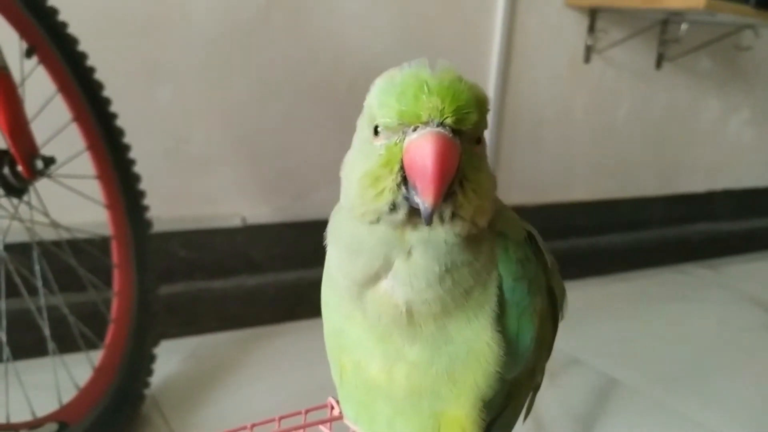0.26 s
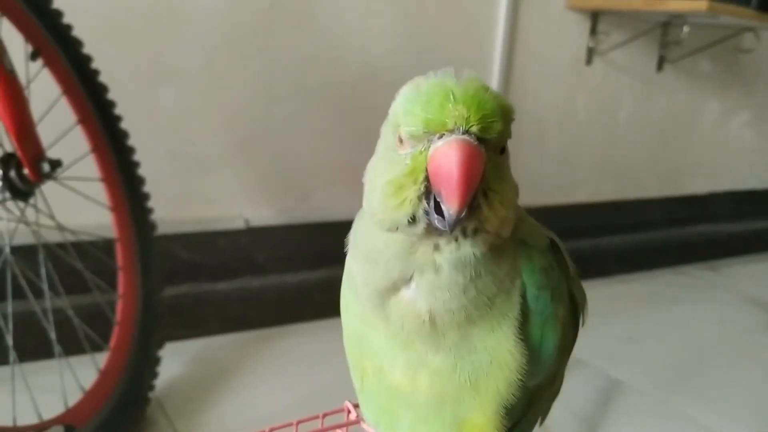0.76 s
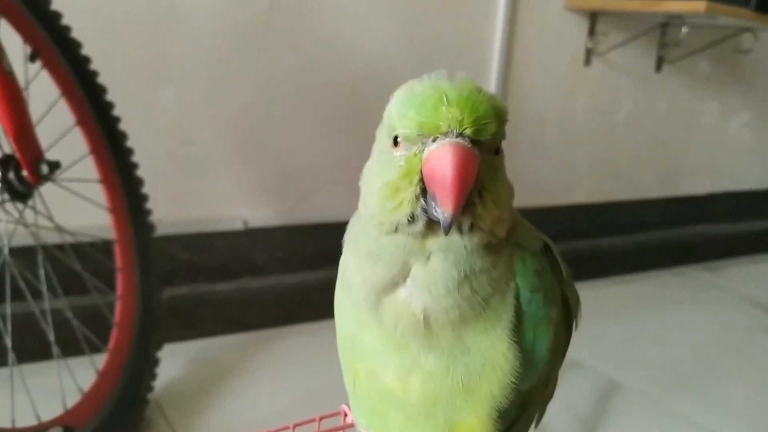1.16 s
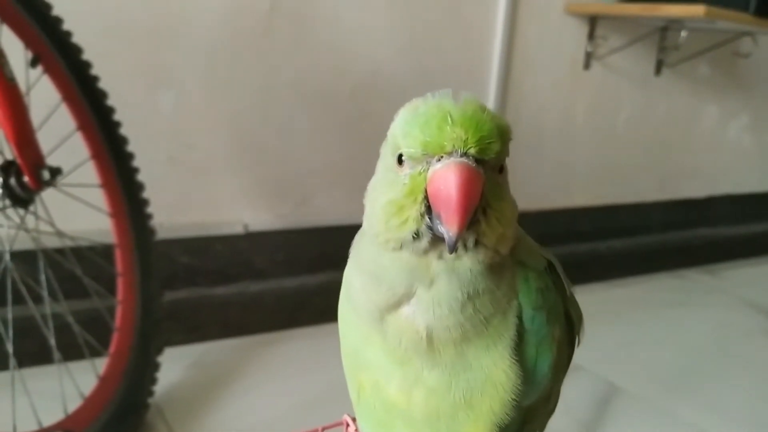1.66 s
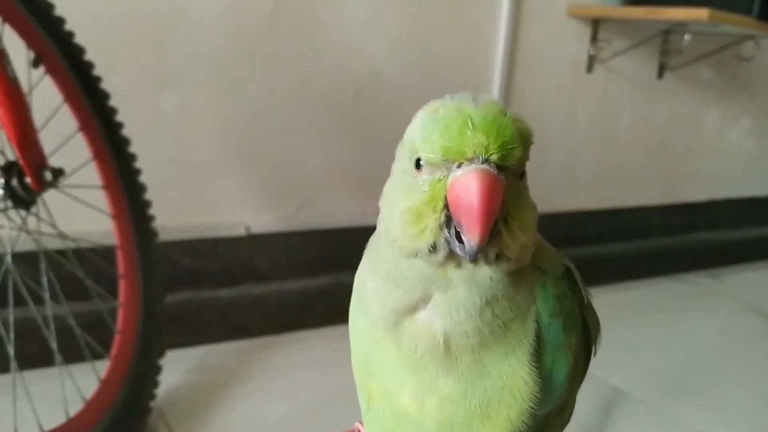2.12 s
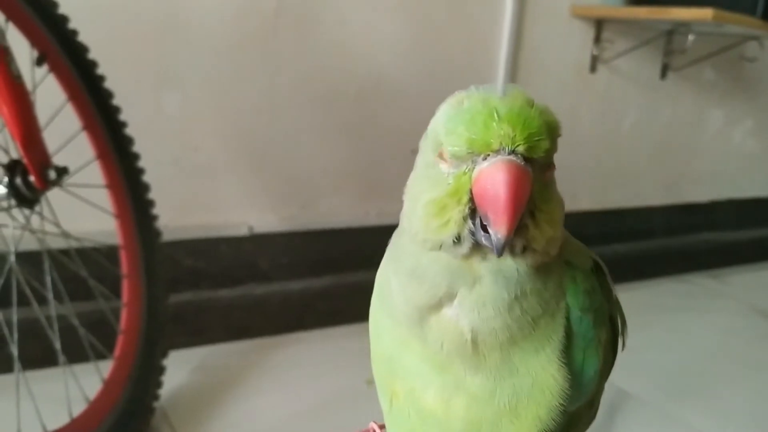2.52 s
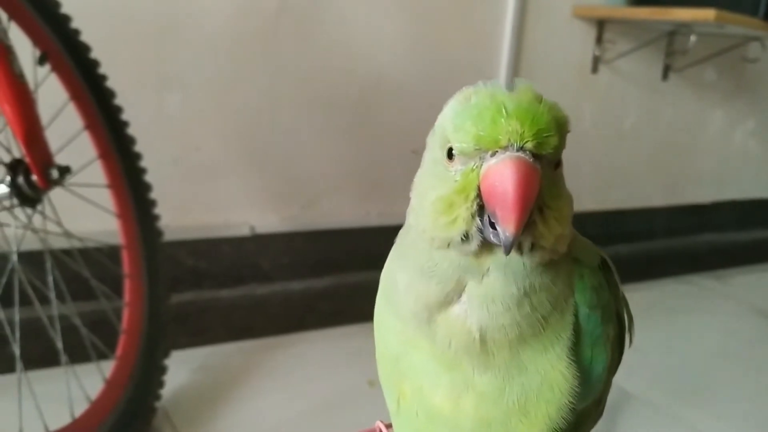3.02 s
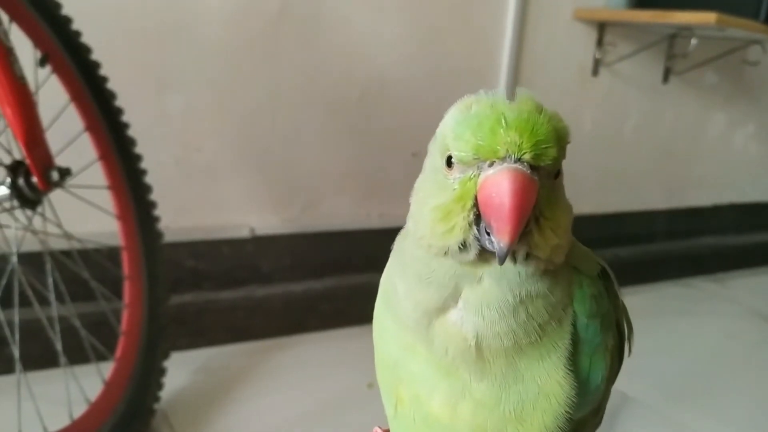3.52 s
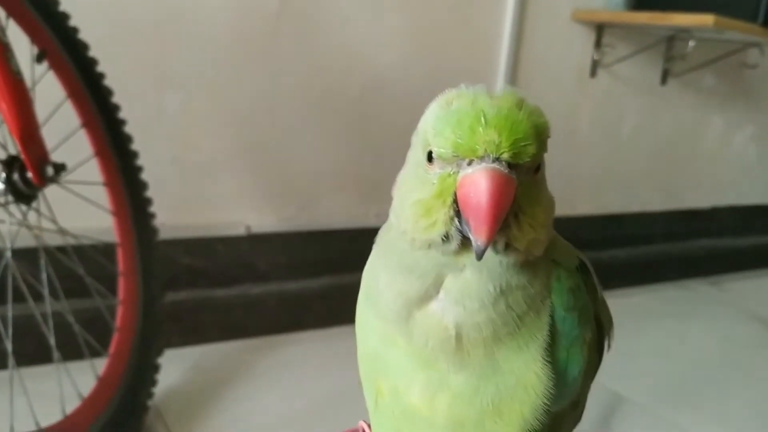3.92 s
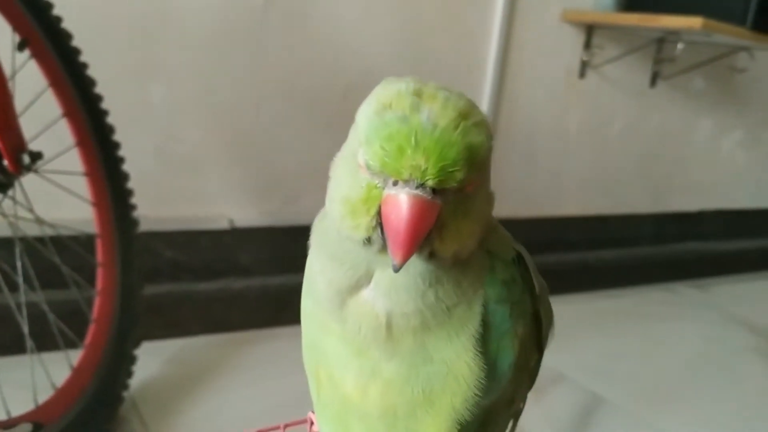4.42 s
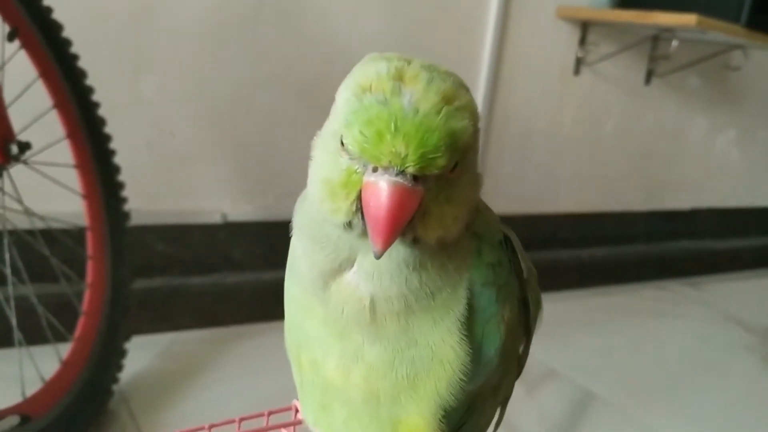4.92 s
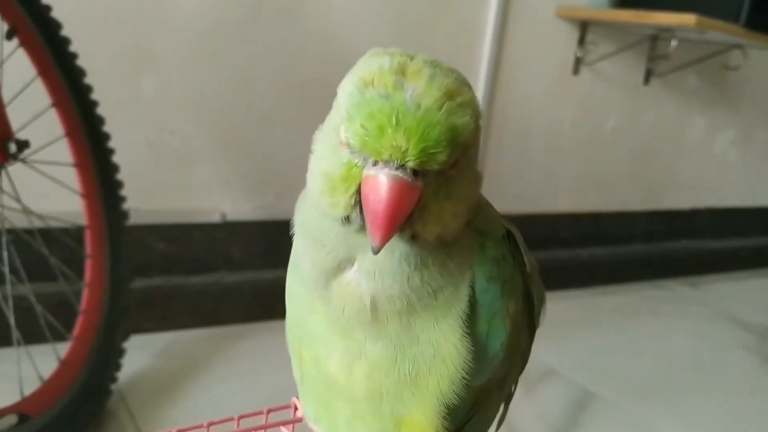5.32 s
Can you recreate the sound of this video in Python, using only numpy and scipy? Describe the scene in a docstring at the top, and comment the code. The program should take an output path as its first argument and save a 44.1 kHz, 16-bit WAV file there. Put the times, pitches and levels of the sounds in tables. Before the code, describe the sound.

A close parakeet whistles a broken run of short gliding calls, some sweet, some raspy, in a quiet hard-walled room with faint hum.

```python
"""A bare tiled room, with a parakeet close to a two-port microphone whistling a run of gliding calls.
Each note is a stack of partials on one gliding pitch that may jump register, roughened by rasp and breath.
The hard walls answer with early echoes and a tail of random taps that dies band by band.
Beneath lie shaped noise for the room air, the ring of an earlier call, a motor hum and thin whine
made of drifting tones, and one soft low bump."""
import sys
import numpy as np
from scipy import signal
from scipy.fft import rfft, irfft
from scipy.io import wavfile
from scipy.ndimage import uniform_filter1d, minimum_filter1d

SR = 44100
rng = np.random.default_rng(int(sys.argv[2]) if len(sys.argv) > 2 else 0)


def transcribe(u):
    """Save the signal u as a 16-bit wav file named by the first command-line argument.

    u: samples, shape (n,) or (channels, n), limited to [-1, 1]; the rate is SR.
    q: integer samples, one column per channel.
    """
    v = np.clip(np.atleast_2d(u).T, -1, 1)
    q = np.round(v * 32767).astype(np.int16)
    wavfile.write(sys.argv[1], SR, q)


N = 245637
EDGE_HZ = 15950  # top of the microphone's band


def gain_of(db):
    """dB to amplitude."""
    return 10 ** (np.asarray(db) / 20)


def evened(x):
    """Scales to rms 1."""
    return x / np.sqrt(np.mean(x ** 2) + 1e-20)


def read(points, hz, column=1):
    """Reads one column of a table on a log-frequency axis."""
    table = np.transpose(points)
    return np.interp(np.log(hz + 1), np.log(table[0] + 1), table[column])


def add(mix, s, sound):
    """Mixes a sound in at time s."""
    part = mix[:, round(s * SR):][:, :sound.shape[-1]]
    part += sound[..., :part.shape[1]]


def shake(shape, size):
    """Smooth random motion of rms 1: noise averaged twice over size samples."""
    once = uniform_filter1d(rng.standard_normal(shape), size)
    return evened(uniform_filter1d(once, size))


def wavering(hz, width, steady=0):
    """A tone whose height and phase drift at random: noise in a narrow resonance, plus a steady share."""
    r = np.exp(-np.pi * width / SR)
    noise = rng.standard_normal(N + SR) + 1j * rng.standard_normal(N + SR)
    drift = signal.lfilter([1], [1, -r], noise)[SR:]  # the first second lets the resonance settle
    drift = steady + drift / np.std(drift)
    return evened((drift * np.exp(2j * np.pi * hz * np.arange(N) / SR)).real)


# colour of the room air: (frequency [Hz], relative level [dB])
AIR_COLOUR = [(12, -21.5), (20, 4.5), (55, -10.5), (149, -9.5), (268, -10.5), (300, -14), (335, -10.5),
              (482, -14), (819, -17.5), (3700, -30.5), (4370, -28.5), (5620, -33), (8790, -29.5),
              (12000, -30), (15800, -35)]
# how alike the air is in the two ports: (frequency [Hz], left-right likeness [-1 to 1])
PORT_LIKENESS = [(60, 0.7), (180, 1), (550, 0.32), (1650, 0.27), (4970, 0.063), (15000, -0.23)]
AIR_DB, AIR_PATCH_DB = -57, 0.42  # rms level; unevenness in time and frequency


def air():
    """Room air and microphone hiss: alike in both ports in the bass, unrelated in the treble."""
    frames, hz = N // 512 + 5, np.fft.rfftfreq(2048, 1 / SR)
    a, b, c, d, patches = rng.standard_normal((5, 1025, frames))
    patches = uniform_filter1d(patches, 12, axis=0)
    patches = evened(uniform_filter1d(patches, 14, axis=1))
    same = np.clip(read(PORT_LIKENESS, hz), -1, 1)[:, None]
    left = a + 1j * b
    right = same * left + np.sqrt(1 - same ** 2) * (c + 1j * d)
    z = np.array([left, right]) * gain_of(read(AIR_COLOUR, hz)[:, None] + AIR_PATCH_DB * patches)
    noise = signal.istft(z, nperseg=2048, noverlap=1536)[1][:, :N]
    return gain_of(AIR_DB) * evened(noise)


# an earlier call still rings: (frequency [Hz], width [Hz], level at 0 s [dB])
EARLIER_CALL = [(1818, 30, -52), (7250, 150, -72)]


def linger():
    """The ring of the earlier call, different at each port, dying as fast as the walls let its pitch die."""
    t = np.arange(N) / SR
    ring = np.zeros((2, N))
    for hz, width, db in EARLIER_CALL:
        fade = gain_of(db - 60 * t / read(WALL_DECAY, hz))
        ring += fade * [wavering(hz, width), wavering(hz, width)]
    return ring


# motor hum and thin whine, tones that drift a little: (frequency [Hz], width [Hz], level [dB])
HUM_TONES = [(153, 8.2, -71), (305.4, 4, -68.5), (496, 6, -74.5), (547, 6.4, -76), (4000, 12, -91),
             (4320, 12, -76)]


def hum():
    """Motor hum and whine: each tone is a steady share plus a drifting share, alike in both ports."""
    return sum(gain_of(db) * wavering(hz, width, steady=1.0) for hz, width, db in HUM_TONES)


# moments when the voice turns hoarse: (time [s], width [s], added rasp [0-1])
HOARSE_MOMENTS = [(1.26, .03, 0.39), (1.965, 0.013, 0.24), (2.535, 0.01, 0.15), (3.083, 0.011, 0.35),
                  (4.971, 0.0097, 0.12), (5.453, 0.031, .3)]
RASP_PER_GLIDE = .004  # growth of rasp per octave a second of glide


def roughness(t, hz, rasp):
    """Hoarse moments alone, and the whole rasp, which a fast glide also raises."""
    hoarse = sum(more * np.exp(-((t - at) / width) ** 2) for at, width, more in HOARSE_MOMENTS)
    glide = abs(np.gradient(np.log2(hz))) * SR  # octaves a second
    return hoarse, np.clip(rasp + hoarse + RASP_PER_GLIDE * glide, 0, 1)


# colour of the overtones: (frequency [Hz], relative level [dB])
THROAT_COLOUR = [(1500, -7.5), (2800, 3), (3600, 1.5), (4300, 2), (5300, -5.5), (6500, -1.5), (8500, -5),
                 (10500, -12), (16000, -30.5)]
# colour that the beak gives the treble partials: (frequency [Hz], relative level [dB])
BEAK_COLOUR = [(4000, -27), (5200, -21.5), (6300, -1.5), (7500, -14.5), (8700, -9), (10000, -0.5),
               (12800, -0.5), (13700, -19.5), (16000, -29)]
TILT_HZ = 10000  # the treble tilts about this pitch
FLUTTER_DB, SKIRT = .7, 2.1  # flutter of the strongest partial; how far rasp roughens the weak partials


def partial_sizes(k, hz, levels_db, rasp, fall_db, tilt_db, odd_db, shift):
    """Throat and beak colour the partials; faint ones flutter most and grow a rough skirt with rasp."""
    first_db, over_db, upper_db = levels_db
    throat_db = read(THROAT_COLOUR, k * hz) - read(THROAT_COLOUR, 2 * hz)
    over = gain_of(over_db + fall_db * np.log2(k / 2) + throat_db)
    tilt = tilt_db * np.log2(k * hz / TILT_HZ)
    treble = gain_of(upper_db + read(BEAK_COLOUR, k * hz / shift) + tilt + odd_db * (k % 2)) * (k > 2)
    size = np.where(k == 1, gain_of(first_db), np.hypot(over, treble)) * (k * hz < EDGE_HZ)
    weak = (1 - size / size.max(0)) ** 4  # 0 for the strongest partial, near 1 for faint ones
    size *= gain_of(FLUTTER_DB * (1 + 3.5 * weak) * shake(size.shape, size=200))
    return size * (1 + SKIRT * rasp * weak * np.log(k) * shake(size.shape, size=35))


# added delay of the left port over time, as a near reflection changes with each call:
# (time [s], delay [microseconds])
LEFT_DELAY = [(.3, 39.5), (1.3, 23), (2, 10.5), (2.6, 0), (3.2, -4.5), (4.9, 68.5), (5.4, 67.5)]
# a near reflection, delay and level of the left port by pitch:
# (frequency [Hz], delay of the left [microseconds], left-right level [dB])
PORT_REFLECTION = [(990, 18, -2.5), (1380, 70.5, -0.5), (1690, -9, -3), (1780, 31, 5.5), (1920, 108.5, 4.5),
                   (2320, 89.5, 2), (2620, 79.5, -4.5), (3070, 37.5, -2.5), (3614, 46.5, -4.5),
                   (4160, 58, -0.5), (16800, 48, -1)]


def at_ports(t, k, hz, size, turns):
    """A near reflection delays and shades the left port by pitch."""
    lag = (np.interp(t, *np.transpose(LEFT_DELAY)) + read(PORT_REFLECTION, k * hz)) * 1e-6
    lag = uniform_filter1d(lag, size=300)
    shade = gain_of(uniform_filter1d(read(PORT_REFLECTION, k * hz, column=2), size=300) / 2)
    left = size * shade * np.cos(2 * np.pi * (turns - k * hz * lag))
    right = size / shade * np.cos(2 * np.pi * turns)
    return np.sqrt(2) * np.array([left.sum(0), right.sum(0)])


# low scratch of a hoarse moment: (frequency [Hz], relative level [dB])
GRIT_COLOUR = [(500, -29), (900, -4.5), (1400, 1), (2200, -7), (3000, -41)]
# puff against the treble level at full rasp; grit against the fundamental at a hoarseness of 1
PUFF_DB, GRIT_DB = -9, -23


def breath(first_db, upper_db, rasp, hoarse, shift):
    """Air puffs out through the beak as rasp grows, and a low scratch joins when the voice is hoarse."""
    n = len(rasp)
    bins = np.fft.rfftfreq(n, 1 / SR)
    beak, scratch = read(BEAK_COLOUR, bins / shift), read(GRIT_COLOUR, bins)
    puff, grit = (evened(irfft(rfft(rng.standard_normal(n)) * gain_of(colour), n))
                  for colour in (beak, scratch))
    puff = gain_of(upper_db + PUFF_DB) * rasp * puff
    noise = puff + gain_of(first_db + GRIT_DB) * hoarse * grit
    return np.array([np.roll(noise, 3), noise])  # the left port hears it 3 samples late


def note(rows, rasp, fall_db, tilt_db, odd_db, shift, breath_db):
    """Partials on one pitch; an uneven membrane rasps them, the higher ones most."""
    s, *columns = np.transpose(rows)
    t = np.arange(s[0], s[-1], 1 / SR)
    hz, *levels_db = (np.interp(t, s, c) for c in columns)
    hz = uniform_filter1d(hz, 200, mode="nearest")
    k = np.arange(1, 17)[:, None]  # partial numbers
    hoarse, rasp = roughness(t, hz, rasp)
    size = partial_sizes(k, hz, levels_db, rasp, fall_db, tilt_db, odd_db, shift)
    turns = k * (np.cumsum(hz) / SR + .05 * rasp * shake(len(t), size=40))
    tone = at_ports(t, k, hz, size, turns)
    # air through the membranes scatters a faint hiss around every partial
    tone *= 1 + gain_of(breath_db) * shake(len(t), size=8)
    edge = np.clip(np.minimum(t - s[0], s[-1] - t) / 0.002, 0, 1)  # 2 ms fades
    return s[0], (tone + breath(levels_db[0], levels_db[2], rasp, hoarse, shift)) * edge


# one table a note: (time [s], pitch [Hz], fundamental [dB], overtones [dB], treble partials [dB])
CALL_NOTES = [
    [(.245, 995, -42, -43.5, -72.5), (.256, 990, -34, -26.5, -64), (.285, 1575, -25.5, -22.5, -55),
     (.304, 1770, -23, -18, -39.5), (.319, 2027, -18.5, -29, -44.5), (.356, 2220, -19.5, -26.5, -48.5),
     (.364, 2310, -12.5, -43, -57.5)],
    [(.367, 3014, -22.5, -58.5, -50), (.375, 2998, -13.5, -41.5, -63), (.406, 3104, -17, -40, -59.5),
     (.444, 2943, -20, -63.5, -77.5), (.462, 2860, -37.5, -88, -79.5)],
    [(.51, 2165, -24.5, -39, -66), (.53, 2042, -20.5, -22, -56), (.548, 1997, -21.5, -31.5, -65),
     (.568, 2057, -36, -44, -70)],
    [(1.108, 1080, -57, -63, -77), (1.124, 1053, -30.5, -63, -88), (1.142, 1110, -36.5, -75, -86),
     (1.158, 1244, -30, -59, -70), (1.227, 1468, -24.5, -50.5, -47), (1.238, 1583, -29, -55.5, -47),
     (1.279, 1673, -36.5, -59, -63.5), (1.342, 1784, -41.5, -55.5, -48.5), (1.378, 1913, -32.5, -61, -36),
     (1.421, 2039, -25.5, -75, -31.5), (1.435, 2005, -25.5, -59.5, -36), (1.462, 2048, -39, -71.5, -65)],
    [(1.857, 837, -54.5, -60.5, -83.5), (1.873, 885, -34.5, -34, -78.5), (1.908, 1302, -30.5, -21, -61),
     (1.939, 1720, -25, -30, -57.5), (1.965, 1900, -25, -37, -47), (1.98, 2390, -24.5, -64.5, -58)],
    [(1.974, 2563, -34, -58, -58.5), (1.984, 2520, -14.5, -33, -39), (2.007, 2757, -11, -35.5, -27),
     (2.046, 2886, -10, -23.5, -38), (2.062, 2870, -6, -28, -43.5), (2.074, 2745, -14, -35, -37.5),
     (2.115, 2745, -20.5, -50.5, -45.5), (2.149, 2450, -15.5, -40, -39.5), (2.157, 2435, -33.5, -62, -44.5)],
    [(2.148, 2150, -26.5, -66, -66), (2.158, 1860, -29, -41.5, -36.5), (2.166, 1802, -21, -26, -41),
     (2.205, 1463, -27.5, -29.5, -58), (2.218, 1290, -35, -45, -62)],
    [(2.456, 753, -46.5, -47, -76), (2.483, 1293, -28, -22, -57.5), (2.502, 1522, -23.5, -21.5, -59.5),
     (2.532, 1798, -23, -35.5, -49), (2.553, 1918, -25, -53.5, -58.5), (2.575, 1898, -22.5, -29.5, -36),
     (2.61, 1711, -28.5, -16.5, -57.5), (2.675, 1423, -32, -15.5, -49), (2.697, 1224, -47.5, -49, -100)],
    [(3.037, 558, -46, -51.5, -75), (3.053, 1125, -39, -35, -71.5), (3.07, 1305, -31.5, -24, -65.5),
     (3.087, 1452, -26.5, -15, -58), (3.103, 1448, -26.5, -12, -52.5), (3.118, 1631, -26, -19, -59.5),
     (3.15, 1682, -28, -19, -60), (3.2, 1517, -31.5, -20.5, -43.5), (3.258, 1368, -33, -20.5, -52),
     (3.292, 1379, -44.5, -37.5, -78)],
    [(4.882, 2430, -44, -69, -69), (4.89, 2394, -23.5, -32.5, -42), (4.909, 2750, -37.5, -35, -41),
     (4.938, 2884, -19, -29, -74), (4.954, 3106, -21, -31, -39), (4.97, 3032, -20.5, -21, -43),
     (4.982, 3158, -14, -21, -47), (4.993, 3150, -21.5, -31, -59), (5.003, 3210, -37, -64, -81)],
    [(5.185, 2970, -46, -52, -51), (5.193, 2924, -26.5, -38.5, -39), (5.216, 2610, -38, -85, -48),
     (5.248, 2340, -27, -84, -44.5), (5.271, 2244, -31.5, -68, -49), (5.327, 2224, -29, -57, -45.5),
     (5.412, 2430, -30.5, -52.5, -48.5), (5.438, 2535, -22, -25.5, -46), (5.447, 2624, -29, -32.5, -46),
     (5.46, 3000, -16.5, -23, -56), (5.474, 3360, -34, -48, -68)],
]
# the voice of each note: (rasp at steady pitch [0-1], overtone fall [dB per octave],
# treble tilt [dB per octave], lift of the odd treble partials [dB],
# shift of the beak colour [pitch ratio], breath [dB])
NOTE_VOICES = [(0.2, -32, 1, 3, 1.01, -42), (0.1, -24.5, -10.5, 3, 0.71, -43),
               (0.12, -18, 2, -9, 0.93, -43), (0.1, -11, -8.5, 1, 1.005, -39),
               (0.18, -35, 2, 2.5, 0.89, -43.5), (0.2, -24, -1, -8.5, 1.05, -47.5),
               (0.07, -42, -4.5, -8.5, 0.83, -48), (0.08, -19, -6, 2, .9, -40),
               (0.08, -15, -23.5, -5, 0.84, -37.5), (0.01, -53, -4.5, -0.5, 1.21, -38.5),
               (0.08, -55, -17.5, -5.5, 1.127, -38)]


def parakeet():
    """The close bird: every note glides along its own pitch and levels, in its own voice."""
    calls = np.zeros((2, N))
    for rows, voice in zip(CALL_NOTES, NOTE_VOICES):
        add(calls, *note(rows, *voice))
    return calls


# how each band dies in the room: (frequency [Hz], time to fall 60 dB [s], relative level [dB])
WALL_DECAY = [(600, 0.85, 4.5), (1557, 0.75, 4.5), (3000, 0.66, -0.5), (6140, 0.58, 2), (8747, 0.17, 13),
              (12000, 1, -8), (14960, 0.89, 9)]
# early echoes off the walls: (delay [ms], left level [dB], right level [dB])
EARLY_ECHOES = [(2.17, -18, -32.5), (4.644, -22, -21.5), (8.158, -17, -17.5), (12.88, -28.5, -31),
                (21, -21.5, -17)]
WALLS_DB = -10.5  # the tail without its early echoes, at the left port, against the direct sound


def walls(x):
    """A few early echoes, then sparse taps of random sign, each band dying at its own speed."""
    taps = np.zeros((2, SR))
    at = np.arange(160, SR - 20, 20) + rng.integers(0, 20, (2, (SR - 161) // 20))
    np.put_along_axis(taps, at, rng.choice([-1., 1.], at.shape), 1)
    hz, t, z = signal.stft(taps, SR, nperseg=256)
    level_db, t60 = read(WALL_DECAY, hz, column=2)[:, None], read(WALL_DECAY, hz)[:, None]
    tail = signal.istft(z * gain_of(level_db - 60 * t / t60), SR, nperseg=256)[1]
    tail *= gain_of(WALLS_DB) / np.linalg.norm(tail[0])
    for ms, *db in EARLY_ECHOES:
        tail[:, round(ms * SR / 1000)] += gain_of(db)
    return signal.fftconvolve(x, tail, axes=1)[:, :N]


THUMP_S, THUMP_HZ, THUMP_DB = 2.11, 78, -51.5  # start, pitch, level at the crest


def thump():
    """A soft low bump: an eighth of a second of sine that swells and sinks, alike in both ports."""
    t = np.arange(SR // 8) / SR
    return THUMP_S, gain_of(THUMP_DB) * np.sin(2 * np.pi * THUMP_HZ * t) * np.hanning(len(t))


def scene():
    """Bird, walls and the quiet room."""
    room = air() + linger() + hum()
    bird = parakeet()
    add(room, *thump())
    return bird + walls(bird) + room


RIPPLE_HZ, RIPPLE_DB = 370, -27  # a faint quick ripple of level puts side tones beside every line
CEILING_DB = -3.5  # limiter ceiling


def record(dry):
    """The microphone end: the ripple, a limiter on the loudest whistle, then the band limit."""
    rippled = dry * (1 + gain_of(RIPPLE_DB) * np.sin(2 * np.pi * RIPPLE_HZ * np.arange(N) / SR))
    peak = -minimum_filter1d(-abs(rippled).max(0), size=200)  # loudest sample near each moment
    limited = rippled * uniform_filter1d(np.minimum(gain_of(CEILING_DB) / peak, 1), size=200)
    band = signal.firwin(511, EDGE_HZ, window=("kaiser", 9), fs=SR)
    return signal.oaconvolve(limited, band[None], "same")


dry = scene()
out = record(dry)
transcribe(out)
```